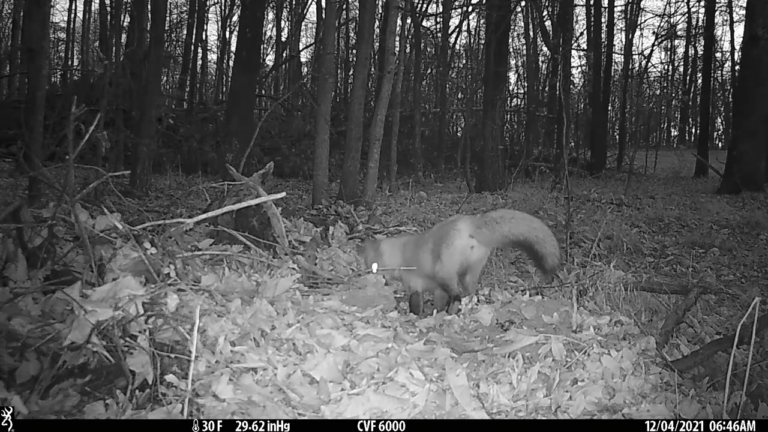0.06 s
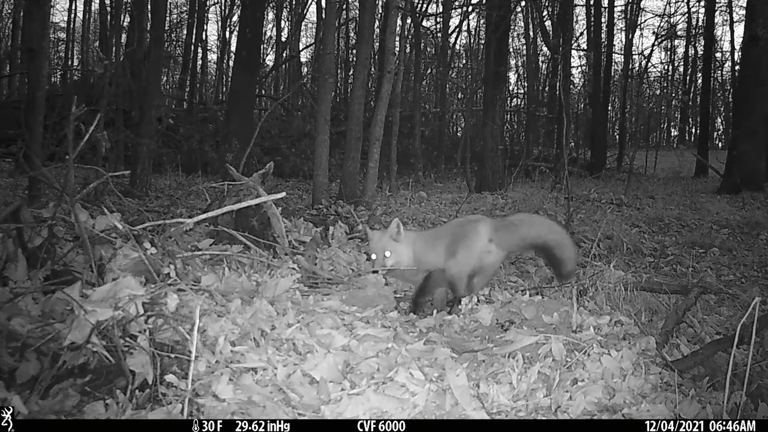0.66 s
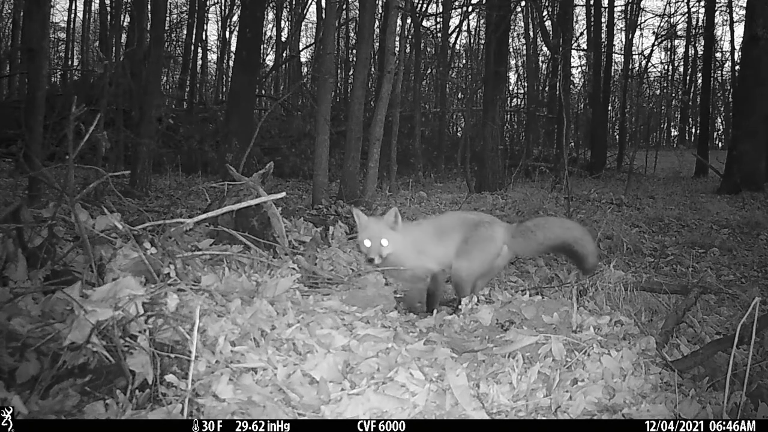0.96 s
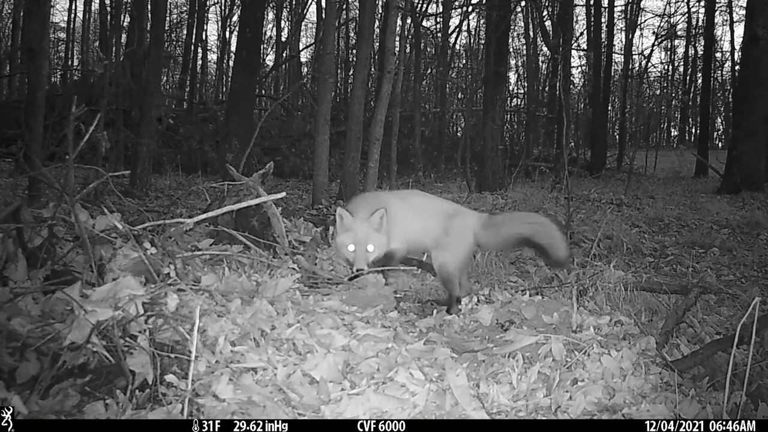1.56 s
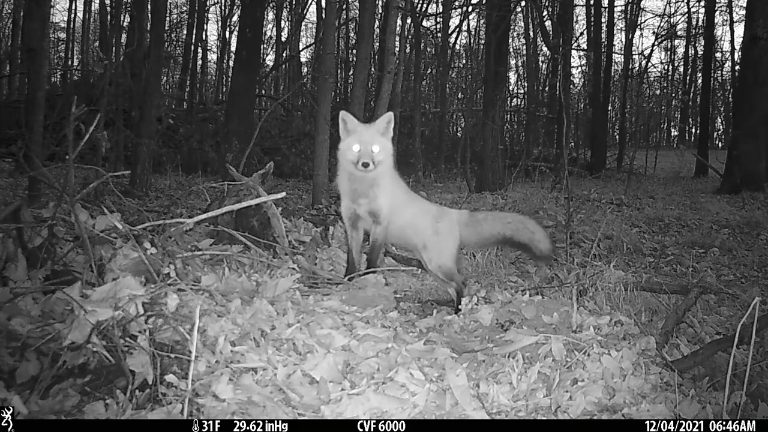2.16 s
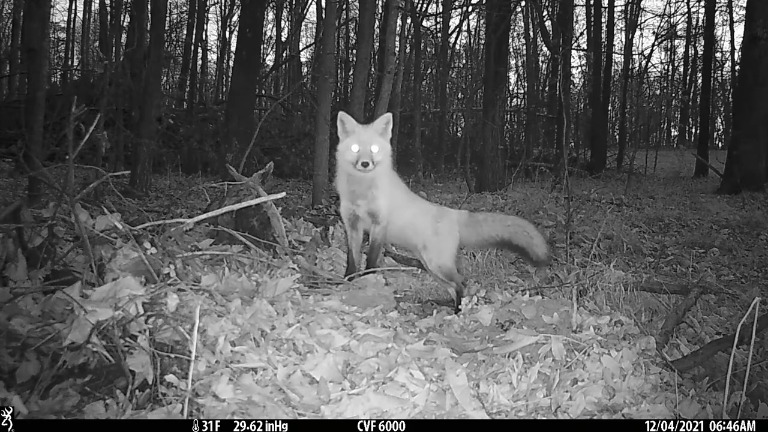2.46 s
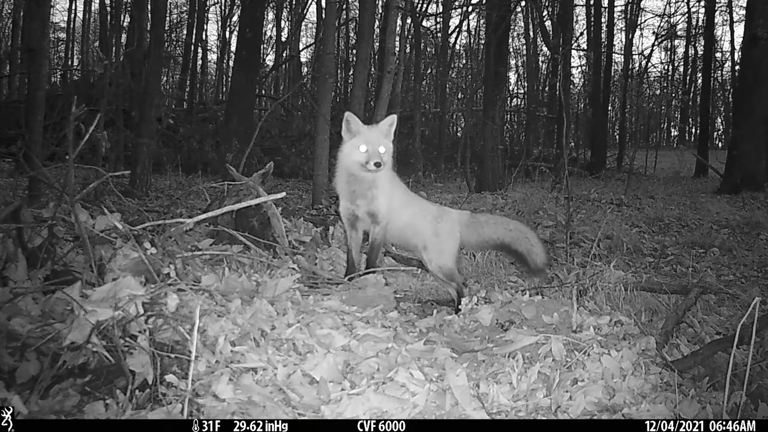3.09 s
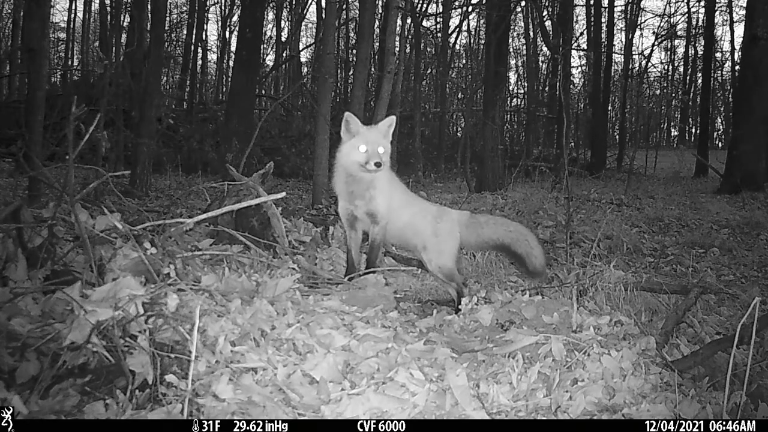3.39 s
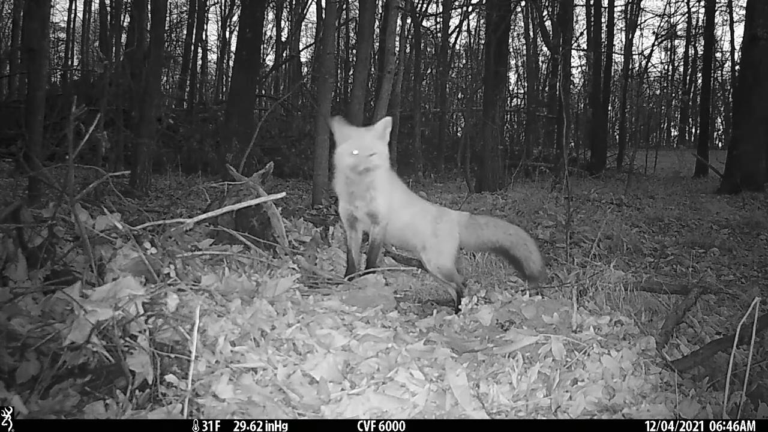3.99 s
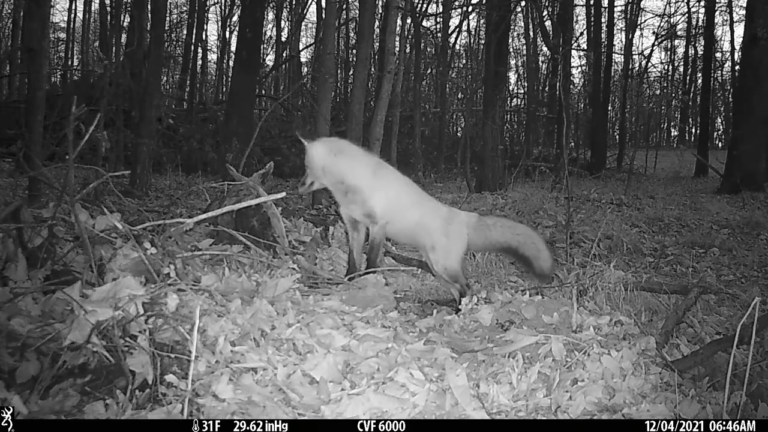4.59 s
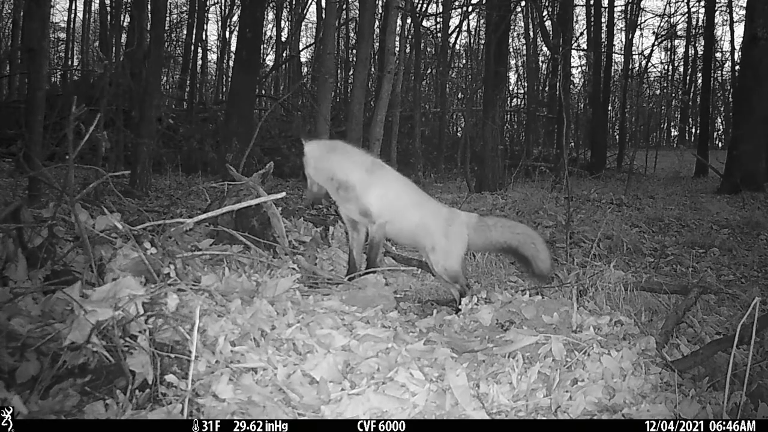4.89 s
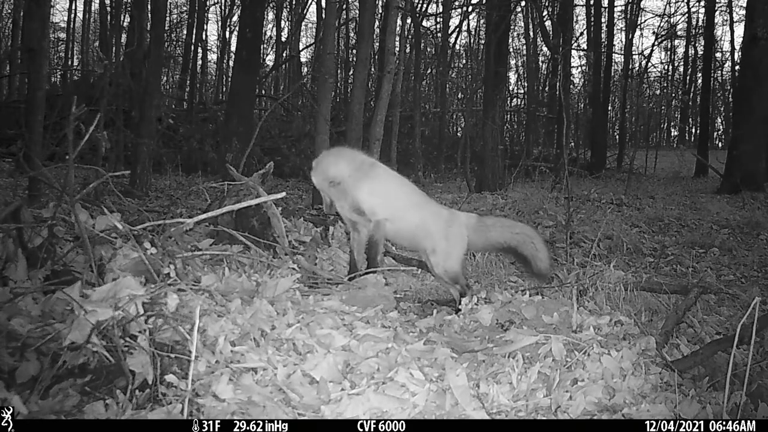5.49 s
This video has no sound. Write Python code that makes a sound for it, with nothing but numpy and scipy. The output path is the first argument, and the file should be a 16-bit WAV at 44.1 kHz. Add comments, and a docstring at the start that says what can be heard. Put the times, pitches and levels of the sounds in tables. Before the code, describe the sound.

Two songbirds call back and forth in a quiet forest. The closer one sings first, a short run of clear slurred whistles; a farther one replies with three softer, more echoing warbles; then the first sings the same run again. A faint, even hiss lies behind them throughout, along with light, rapid ticking and a barely audible hum in the microphone.

```python
"""Two songbirds in bare woods at dawn

A near bird whistles a phrase of slurs twice; in between, a far bird sings a rolling figure three times.
Trunks scatter each note into a long tail. Underneath: a steady hiss that dips briefly now and then,
a faint hum, and tiny ticks leaking from a small camera's electronics into its microphone."""
import sys
import numpy as np
from scipy import signal
from scipy.fft import rfft, irfft
from scipy.io import wavfile

SR = 44100
rng = np.random.default_rng(int(sys.argv[2]) if len(sys.argv) > 2 else 0)


def pcm_store(signal):
    """Save signal as 16-bit PCM."""
    levels = np.round(np.clip(np.atleast_2d(signal), -1, 1) * 32767)
    wavfile.write(sys.argv[1], SR, levels.astype(np.int16).T)


N = 244314


def gain_of(db):
    """Decibels to gain."""
    return 10 ** (np.asarray(db) / 20)


def unit_rms(x):
    """Scales to rms 1."""
    return x / np.sqrt(np.mean(x ** 2) + 1e-20)


def interp_log_hz(table, hz):
    """Reads a table on a log-frequency axis."""
    table_hz, value = np.transpose(table)
    return np.interp(np.log(hz + 1), np.log(table_hz + 1), value)


def add(mix, start_s, sound):
    """Adds a sound into the mix."""
    part = mix[max(round(start_s * SR), 0):][:len(sound)]
    part += sound[:len(part)]


def drift(rate_hz):
    """Low-passed random motion, rms 1."""
    hz = np.fft.rfftfreq(N, 1 / SR)
    return unit_rms(irfft(rfft(rng.standard_normal(N)) * np.exp(-(hz / rate_hz) ** 2), N))


# hiss spectrum: (frequency [Hz], relative density [dB])
HISS_SPECTRUM = [(8, -1.5), (22, -6), (65, -1.5), (250, -3.5), (700, 0.5), (1300, -0.5), (2100, -3),
                 (3600, -4.5), (5000, -8.5), (6300, -10), (9600, -13), (12000, -17), (13200, -20),
                 (15700, -19)]
# narrow hollows in it: (centre [Hz], width [Hz], depth [dB])
HISS_HOLLOWS = [(5500, 250, 8.5), (10930, 440, 5.5)]

def hiss(level_db=-59.5, flicker_db=1.15):
    """Noise of distant air and the microphone itself; the level flickers slightly."""
    hz = np.fft.rfftfreq(N, 1 / SR)
    hollows_db = sum(db * np.exp(-((hz - centre) / width) ** 2) for centre, width, db in HISS_HOLLOWS)
    colour_db = interp_log_hz(HISS_SPECTRUM, hz) - hollows_db
    noise = unit_rms(irfft(rfft(rng.standard_normal(N)) * gain_of(colour_db), N))
    return gain_of(level_db + flicker_db * drift(rate_hz=70)) * noise


# hum tones: (frequency [Hz], start rms [dB], end rms [dB])
HUM_TONES = [(133, -77, -77.5), (212.5, -75, -91)]

def hum(waver=0.0027, swell_db=0.7):
    """Two faint low tones, wavering slowly."""
    out = np.zeros(N)
    for hz, start_db, end_db in HUM_TONES:
        phase = 2 * np.pi * np.cumsum(hz * (1 + waver * drift(rate_hz=4.8))) / SR
        rms_db = np.linspace(start_db, end_db, N) + swell_db * drift(rate_hz=1.8)
        out += np.sqrt(2) * gain_of(rms_db) * np.sin(phase)
    return out


# camera clocks: (first tick [s], period [s])
TICK_TIMING = [(.0148, 1 / 60), (.0476, 1 / 20), (.2117, 1 / 4)]
# tick strength per clock: (mean peak [dB])
TICK_PEAKS_DB = [-62.5, -48.5, -44.5]

def camera_ticks(width_s=0.00013, spread_db=2):
    """Electrical leakage: regular one-sided blips, each with a small rebound."""
    t = np.arange(-30, 60) / SR
    rebound = 0.25 * np.exp(-(t / width_s - 2.6) ** 2 / 2)
    blip = rebound - np.exp(-(t / width_s) ** 2)
    out = np.zeros(N)
    for (first_s, period_s), peak_db in zip(TICK_TIMING, TICK_PEAKS_DB):
        for tick_s in np.arange(first_s, N / SR, period_s):
            add(out, tick_s + t[0], gain_of(peak_db + spread_db * rng.standard_normal()) * blip)
    return out


def slur_hz(t, from_hz, to_hz, steepest_s, glide_s, scoop=0.05, scoop_s=0.0049):
    """Note pitch: a quick scoop from below into one S-shaped glide."""
    bend = np.tanh((t - steepest_s) / glide_s)
    progress = (bend - bend[0]) / (bend[-1] - bend[0])
    return (from_hz + (to_hz - from_hz) * progress) * (1 - scoop * np.exp(-t / scoop_s))


def note_envelope(t, attack_s, fade_db, release_s=0.0075):
    """Note strength: swell, fade, cut-off."""
    attack = np.minimum(t / attack_s, 1) ** 0.96
    fade = gain_of(-fade_db * np.interp(t, [attack_s, t[-1]], [0, 1]))
    release = np.minimum((t[-1] - t) / release_s, 1)
    return attack * fade * release


def birdsong(notes, repeats, waver, flutter_db, octave_db, throat_hz=2050):
    """Near-pure gliding whistles, trembling slightly in pitch and strength."""
    out = np.zeros(N)
    tremble, flutter = drift(rate_hz=150), drift(rate_hz=130)
    for start_s, effort_db, crescendo_db_per_s, pitch_ratio in repeats:
        for onset_s, length_s, from_hz, to_hz, steepest_s, glide_s, attack_s, peak_db, fade_db in notes:
            t = np.arange(0, length_s, 1 / SR)
            span = (round((start_s + onset_s) * SR) + np.arange(len(t))) % N
            hz = slur_hz(t, from_hz, to_hz, steepest_s, glide_s)
            hz *= pitch_ratio * (1 + waver * tremble[span])
            phase = 2 * np.pi * np.cumsum(hz) / SR
            # the throat passes the octave only on the lowest notes
            octave_gain = gain_of(octave_db) / (1 + (hz / throat_hz) ** 16)
            tone = np.sin(phase) + octave_gain * np.sin(2 * phase)
            level_db = peak_db + effort_db + crescendo_db_per_s * onset_s + flutter_db * flutter[span]
            add(out, start_s + onset_s, gain_of(level_db) * note_envelope(t, attack_s, fade_db) * tone)
    return out


# whistles: high rise, fall, chip, drop, low rise, upsweep, fall, chip, drop
# (onset [s], length [s], from [Hz], to [Hz], steepest [s], glide [s], attack [s], peak [dB], fade [dB])
NEAR_NOTES = [ (0, 0.072, 4104, 5310, 0.045, .018, .022, -33.5, 12),
              (.117, 0.088, 3246, 2354, .037, 0.0171, 0.021, -28, 12),
              (.244, 0.044, 2765, 3000, 0.0157, 0.0087, .019, -26.5, 22.5),
              (.289, 0.0337, 2384, 1624, 0.0119, .016, 0.0052, -42.5, 5.5),
              (.428, .1, 1657, 2250, 0.0214, .048, 0.068, -38.5, 6.5),
              (.555, 0.079, 3327, 5360, .075, .06, 0.025, -23.5, 17),
              (.679, .092, 3237, 2344, .041, .018, .031, -27, 15),
              (.811, 0.044, 2720, 2994, .017, 0.0086, .019, -26, 23),
              (.857, 0.0324, 2390, 1637, 0.0125, 0.015, 0.0057, -39.5, 11), ]
# each phrase sung: (start [s], effort [dB], crescendo [dB/s], pitch [ratio])
NEAR_REPEATS = [(.572, 0, 0, 1.0), (4.737, -3.5, 3, 0.99)]

def near_bird():
    """A phrase of slurs, heard over the forest floor with light echoes."""
    song = birdsong(NEAR_NOTES, NEAR_REPEATS, waver=0.0032, flutter_db=2.5, octave_db=-14.5)
    echoes = woods_echoes(song, early_db=-9, early_t60_s=0.27, late_db=-12.5, trunk_s=0.022)
    return ground_notch(song) + echoes


def ground_notch(x, centre_hz=1900, width_hz=400, depth_db=12):
    """The floor bounce cancels the direct path in one band, so low notes arrive mostly as echo."""
    hz = np.fft.rfftfreq(N, 1 / SR)
    notch_db = depth_db * np.exp(-((hz - centre_hz) / width_hz) ** 2)
    return irfft(rfft(x) * gain_of(-notch_db), N)


# ring time of the woods: (frequency [Hz], t60 [s])
WOODS_T60 = [(1800, 0.54), (2400, 1.15), (3000, 1.25), (4000, 0.95), (5200, 0.66)]

def woods_echoes(x, early_db, early_t60_s, late_db, trunk_s, trunk_db=-15, scatter_per_s=2500):
    """One big trunk's echo, quick scatter from its neighbours and the long tail of the deeper woods."""
    t = np.arange(int(1.5 * SR)) / SR
    build_up = 1 - np.exp(-(t / 0.008) ** 2)
    scatter = rng.choice([-1., 1.], len(t)) * (rng.random(len(t)) < scatter_per_s / SR)
    early = scatter * build_up * gain_of(-60 * t / early_t60_s)
    hz, frame_s, noise = signal.stft(rng.standard_normal(len(t)), SR, nperseg=256)
    decay = gain_of(-60 * frame_s / interp_log_hz(WOODS_T60, hz)[:, None])
    late = signal.istft(noise * decay, SR, nperseg=256)[1][:len(t)] * build_up
    response = gain_of(early_db) * early / np.linalg.norm(early)
    response += gain_of(late_db) * late / np.linalg.norm(late)
    response[round(trunk_s * SR)] += gain_of(trunk_db)
    return signal.fftconvolve(x, response)[:N]


# dips in the hiss: (time [s], treble depth [dB])
HISS_DIPS = [(0.595, 20), (1.488, 30), (1.639, 29), (1.809, 27), (2.212, 22), (2.469, 15), (2.918, 26),
             (4.732, 8), (5.264, 26)]

def with_dips(x, fade_s=0.0037, crossover_hz=3500, low_share=0.043):
    """The level sinks for a few milliseconds at each dip, the treble most."""
    t, hz = np.arange(N) / SR, np.fft.rfftfreq(N, 1 / SR)
    dip_db = sum(depth_db * np.exp(-abs(t - time_s) / fade_s) for time_s, depth_db in HISS_DIPS)
    low = irfft(rfft(x) / (1 + (hz / crossover_hz) ** 6), N)
    return low * gain_of(-low_share * dip_db) + (x - low) * gain_of(-dip_db)


# whistles: upward flick, lilt, downward flick, arch, slide
# (onset [s], length [s], from [Hz], to [Hz], steepest [s], glide [s], attack [s], peak [dB], fade [dB])
FAR_NOTES = [ (0, .026, 3590, 4155, .015, 0.015, 0.0064, -41.5, 7),
             (.053, 0.037, 2690, 2970, 0.0168, .007, 0.0071, -49, 4),
             (.109, 0.0244, 2400, 1550, 0.0097, .02, .005, -49, 6.5),
             (.179, 0.048, 3310, 2930, 0.035, .008, 0.022, -41.5, 11.5),
             (.235, .135, 1888, 2373, 0.02604, 0.0205, 0.039, -46, 15), ]
# each figure sung: (start [s], effort [dB], crescendo [dB/s], pitch [ratio])
FAR_REPEATS = [(2.498, -2.5, 12.5, 1.016), (2.984, 1.3, -11.5, 1.008), (3.462, 0.1, 1.5, .99)]

def far_bird():
    """A rolling answer; distance gives it a larger share of echo."""
    song = birdsong(FAR_NOTES, FAR_REPEATS, waver=0.0019, flutter_db=1.56, octave_db=-32)
    return song + woods_echoes(song, early_db=-3.5, early_t60_s=0.2, late_db=-4, trunk_s=0.025)


def scene():
    """Both birds over hiss, hum and ticks; mono."""
    return (near_bird() + far_bird() + with_dips(hiss()) + hum() + camera_ticks())[None]


def record(dry, cutoff_hz=15750):
    """The camera's steep band limit."""
    lowpass = signal.firwin(1023, cutoff_hz, window=("kaiser", 9), fs=SR)
    return signal.oaconvolve(dry, lowpass[None], "same")


dry = scene()
out = record(dry)
pcm_store(out)
```